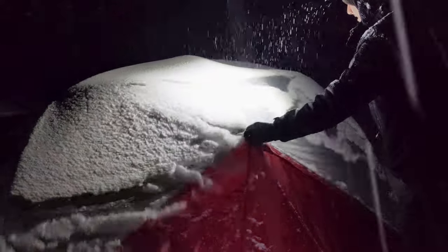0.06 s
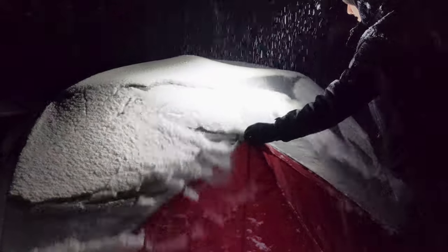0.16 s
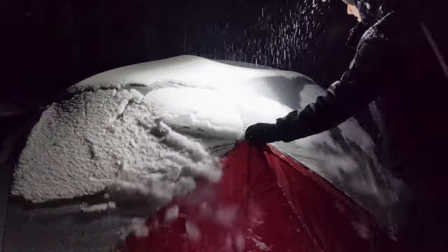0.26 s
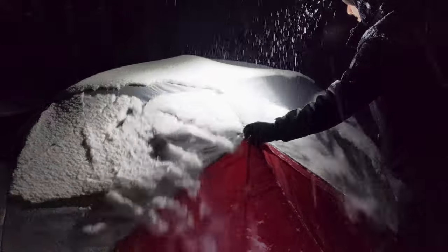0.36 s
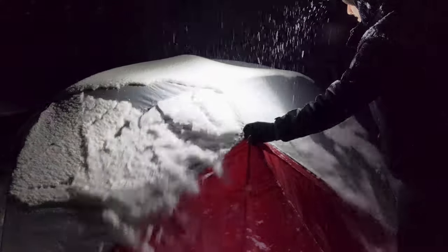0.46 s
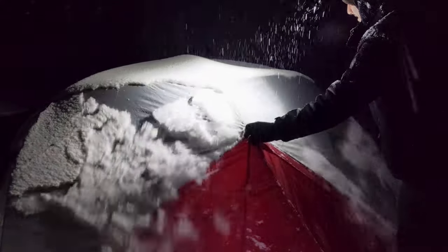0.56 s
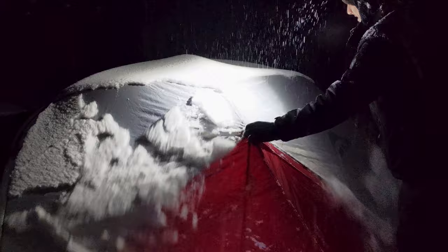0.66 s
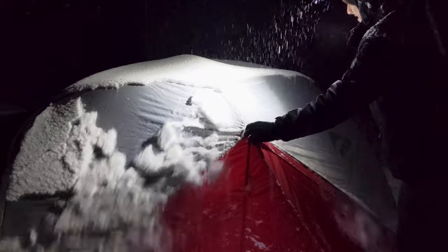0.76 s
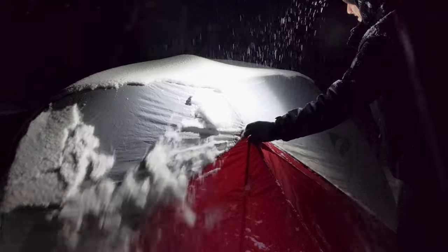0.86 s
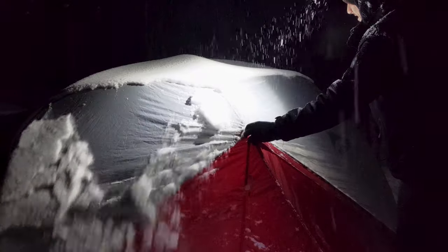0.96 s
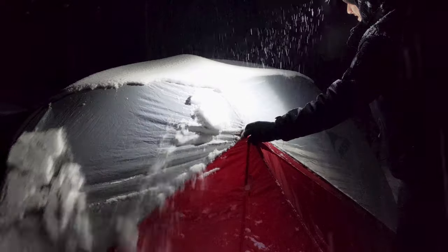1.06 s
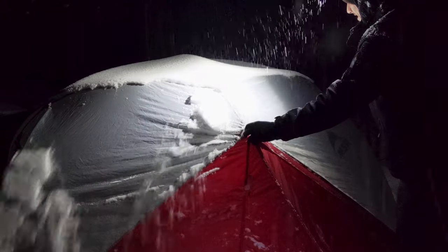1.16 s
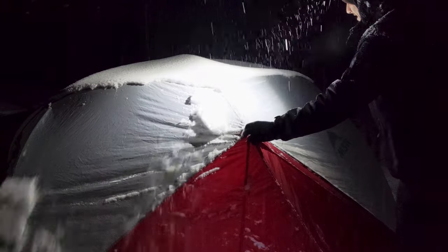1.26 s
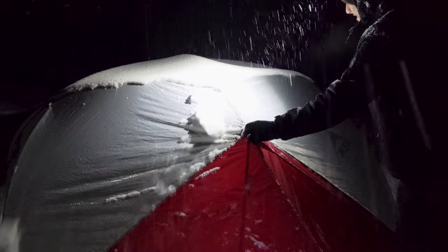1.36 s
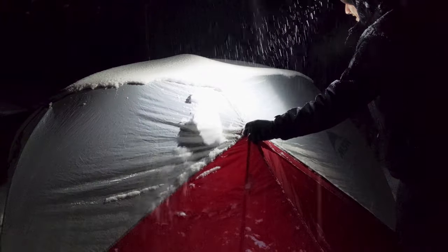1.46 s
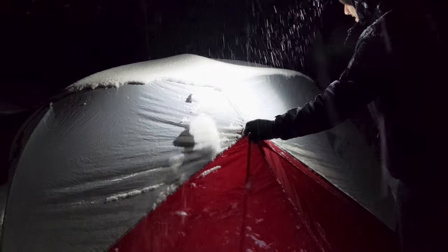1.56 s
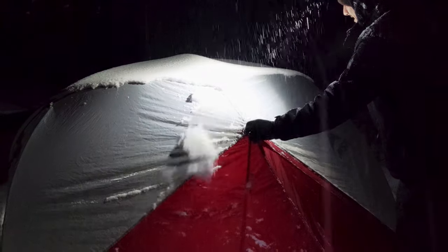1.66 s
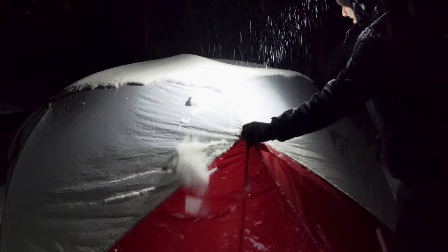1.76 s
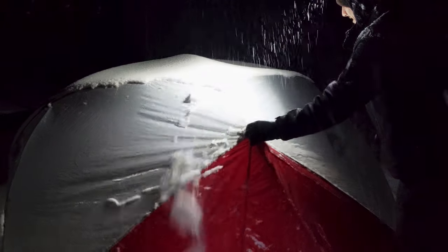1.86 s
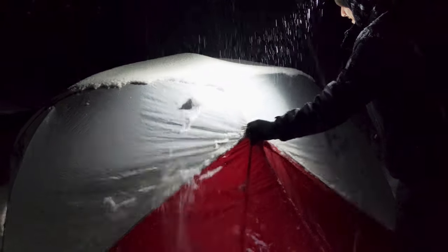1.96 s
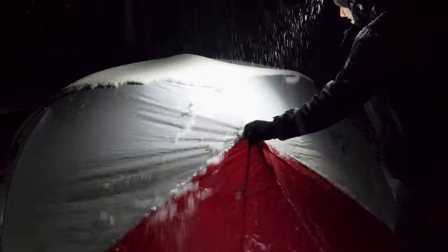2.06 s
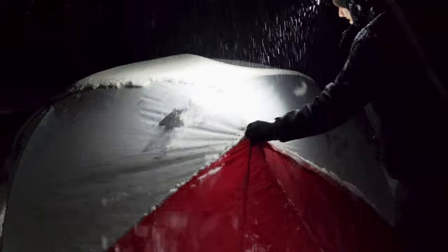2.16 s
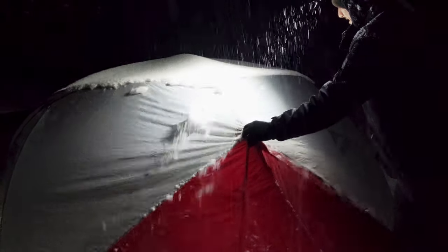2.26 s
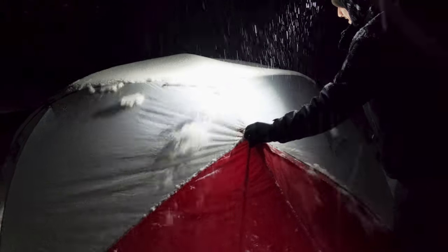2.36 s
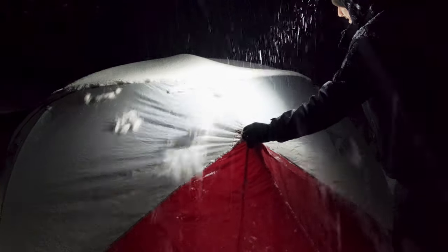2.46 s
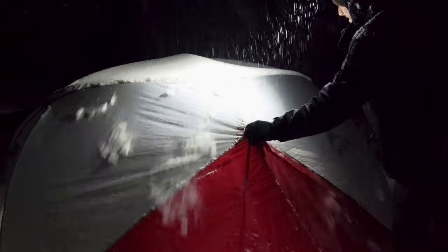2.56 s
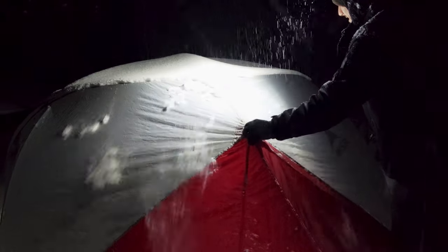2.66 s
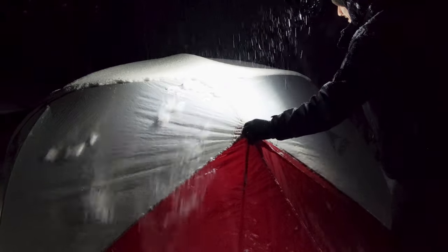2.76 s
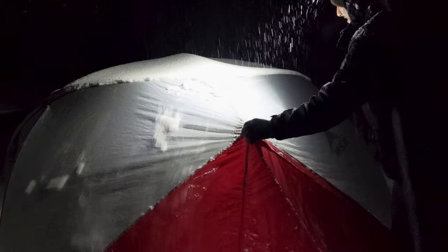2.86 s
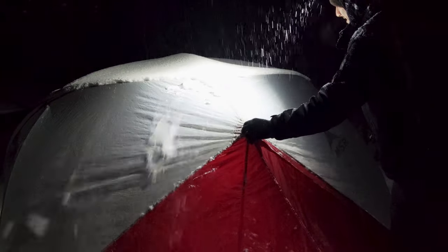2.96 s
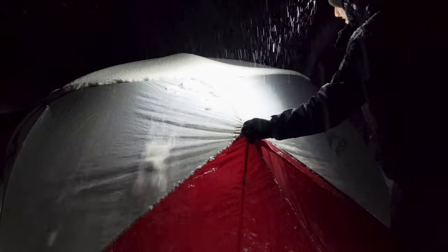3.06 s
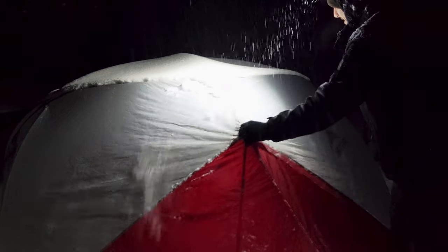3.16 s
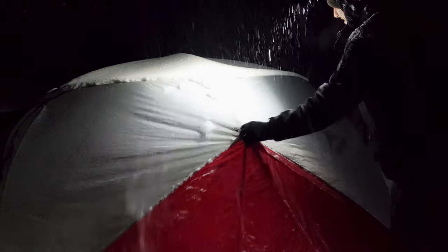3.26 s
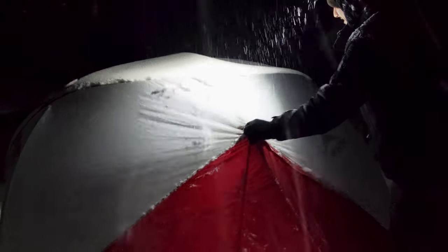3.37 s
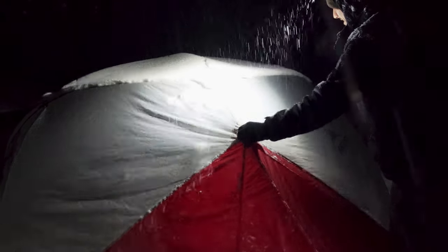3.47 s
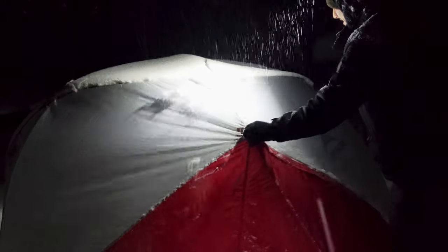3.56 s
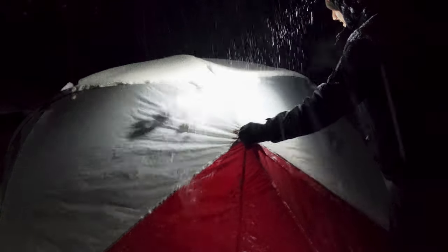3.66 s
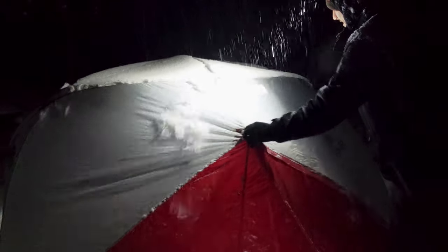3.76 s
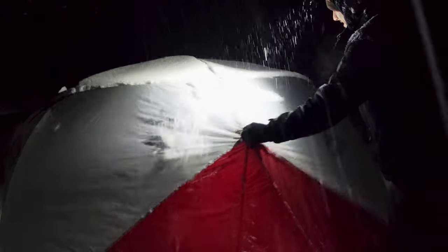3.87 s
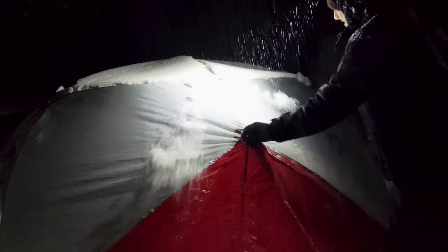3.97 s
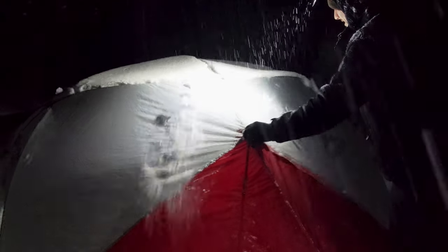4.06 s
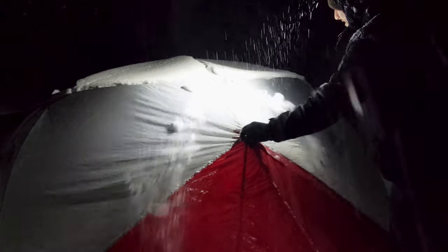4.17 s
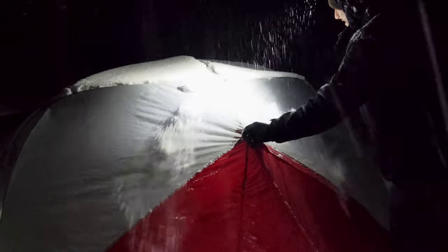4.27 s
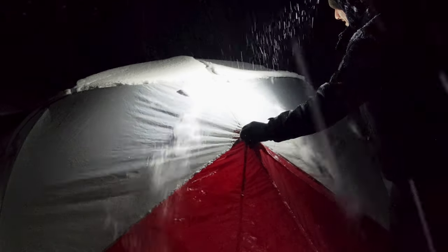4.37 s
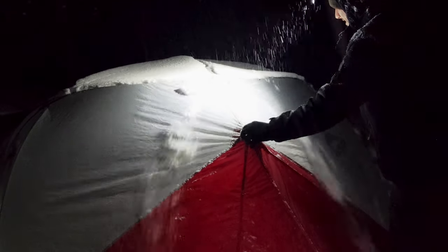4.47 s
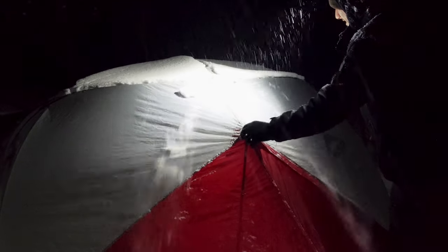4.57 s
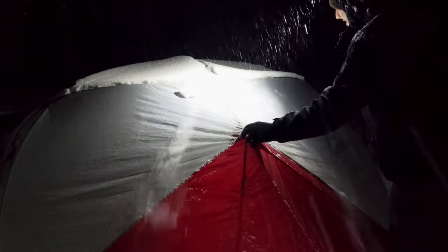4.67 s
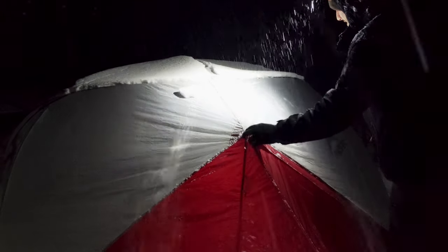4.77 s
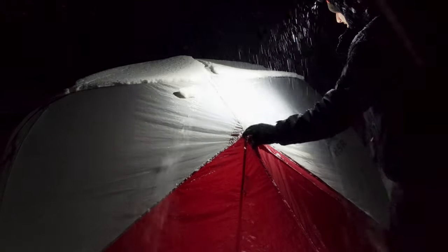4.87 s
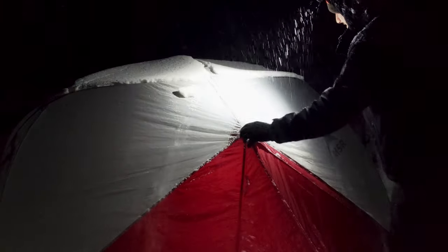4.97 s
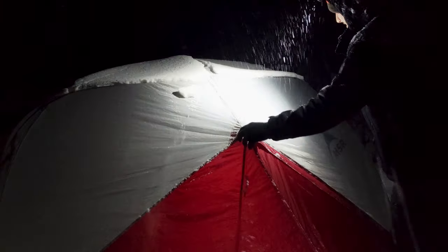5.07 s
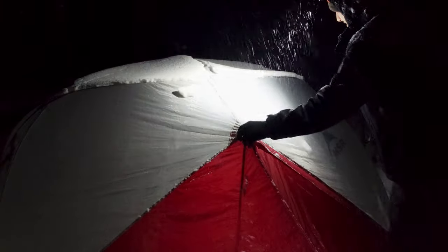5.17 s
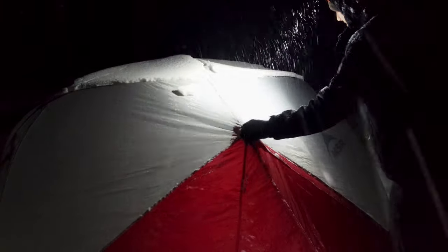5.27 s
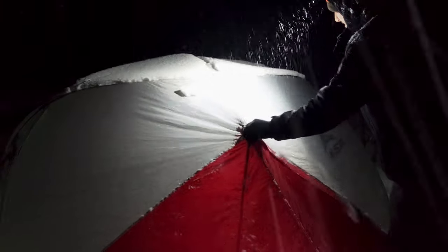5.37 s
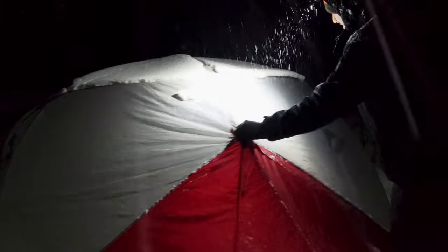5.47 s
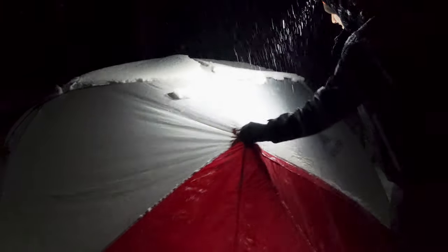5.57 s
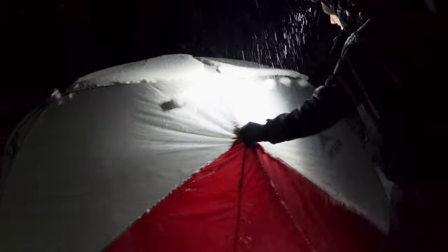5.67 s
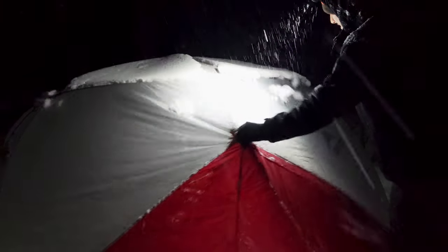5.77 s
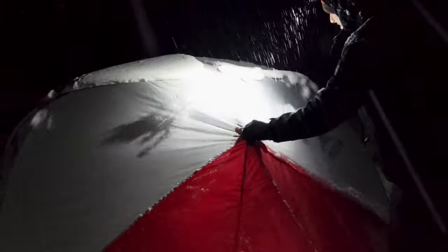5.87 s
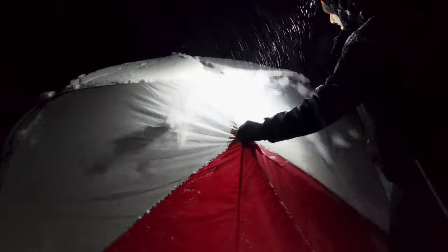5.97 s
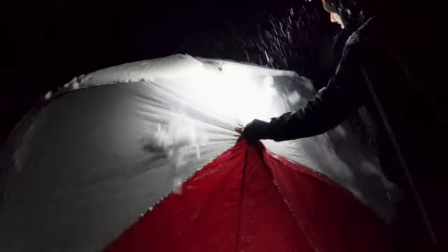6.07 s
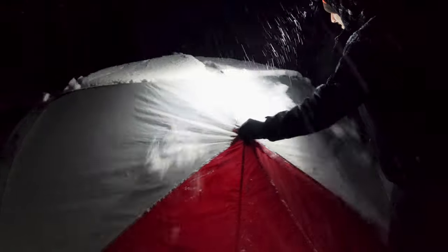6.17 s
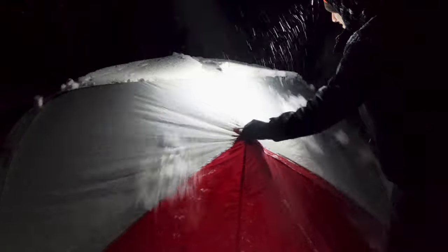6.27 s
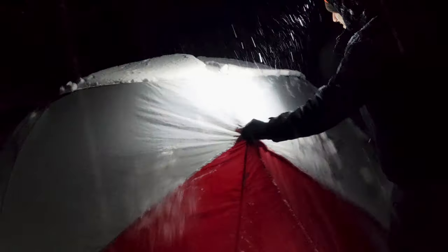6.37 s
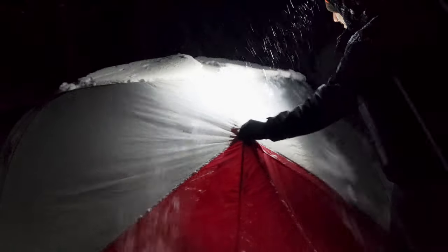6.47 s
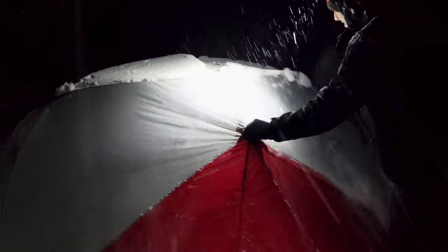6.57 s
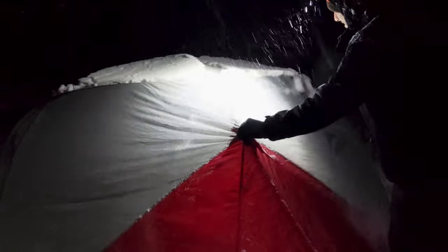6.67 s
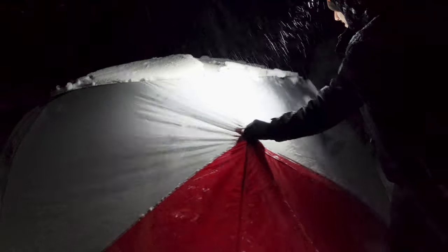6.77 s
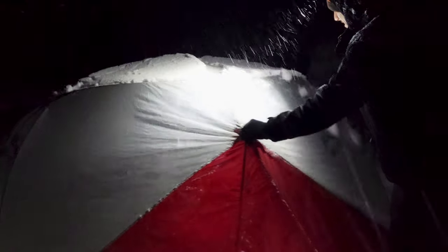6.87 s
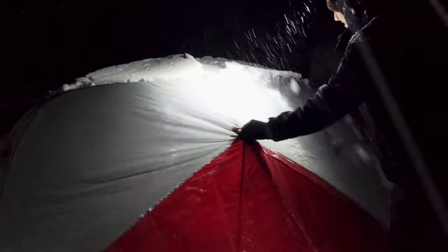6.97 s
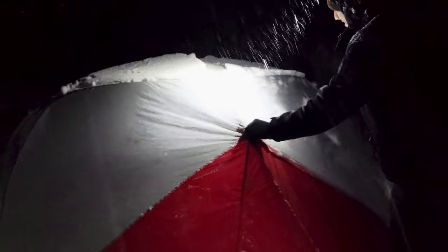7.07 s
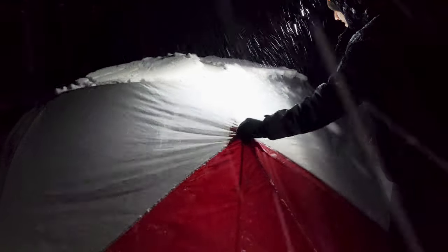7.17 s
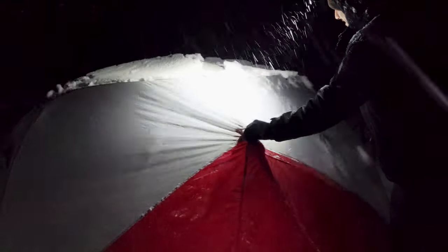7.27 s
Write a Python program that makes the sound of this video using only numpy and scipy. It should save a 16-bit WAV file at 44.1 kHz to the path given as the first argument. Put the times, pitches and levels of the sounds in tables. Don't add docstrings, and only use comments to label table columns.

```python
import sys
import numpy as np
from scipy import signal
from scipy.fft import rfft, irfft
from scipy.io import wavfile
from scipy.ndimage import uniform_filter1d

SR = 44100
rng = np.random.default_rng(int(sys.argv[2]) if len(sys.argv) > 2 else 0)


def voltage_ratio(decibels):
    exponent = np.asarray(decibels, float) / 20
    return 10 ** exponent


def unload_wav(signal):
    wavfile.write(
        sys.argv[1],
        SR,
        np.round(np.clip(np.atleast_2d(signal).T, -1, 1) * 32767).astype(np.int16),
    )


N = 322371
TIME = np.arange(N) / SR
HZ = np.maximum(np.arange(N // 2 + 1) * SR / N, 1)
TOP_HZ = 15760

# t/s, thump level/dB, crunch re thump/dB, thump f/Hz, spread/ms
SNAPS = [(1.807, -60, 3, 218, 8.4), (1.895, -59, -3, 330, 6), (2.13, -51.5, 0.5, 148.4, 6.8),
         (2.348, -49, -2, 142, 5.3), (2.548, -55, -12, 360, 5.7), (2.575, -56.5, -13, 255, 6),
         (3.283, -47, -14.5, 392, 7.3), (3.315, -50.5, -1, 198, 9.8), (3.544, -47, 0, 291.6, 9.1),
         (3.775, -50, 8, 393, 5.3), (4.007, -49.5, -3, 260, 5.4), (4.236, -55, -2.5, 194.7, 6.6),
         (5.567, -41.5, 1, 326, 6.1), (5.8, -39.5, -0.5, 278, 7.6), (6.031, -41, -2.5, 368, 5.6),
         (6.275, -43.5, 1.5, 168.8, 8.1), (6.514, -46, -5.5, 162.4, 8.9), (6.757, -44, -7, 290, 5.6),
         (6.989, -40.5, -4.5, 186, 4.03), (7.238, -43.5, -15, 165, 4.9)]
# t/s, flow level/dB, lumpiness/dB, share of whole slabs/dB
FLOW = [(0, -50.5, 2, 6), (.3, -49, 1.5, 3), (.83, -46.5, -0.5, -0.5), (1.14, -50, 1, -14),
        (1.32, -51.5, -1, -13.5), (1.43, -61, -1.5, 3), (1.72, -63, 1.5, 6.5), (2.12, -60.5, -1.5, 2),
        (2.4, -55.5, 0, -4), (2.6, -57, -1.5, -0.5), (2.9, -60, -1, -5), (3.2, -62.5, -1, 5),
        (3.55, -61, 0.5, 6), (3.9, -56, 1, -5), (4.22, -59, 1, -9), (4.6, -55, -3.5, -14),
        (5.0, -65.5, -1, -11), (5.3, -64, 1.5, 3)]
# t/s, effort level/dB
EFFORT = [(0, -63), (.6, -67.5), (1.3, -70), (1.7, -69), (1.9, -61), (2.15, -62.5), (2.45, -67.5),
          (2.7, -70), (3.05, -68.5), (3.3, -60), (4.1, -63), (4.3, -68.5), (5.0, -70.5), (5.3, -65),
          (5.75, -59.5), (6.2, -61.5), (6.9, -62), (7.31, -59)]


def power(db):
    return voltage_ratio(2 * np.asarray(db, float))


def curves(table):
    s, *columns = np.transpose(table)
    return [np.interp(TIME, s, c) for c in columns]


def on_log(table):
    hz, value = np.transpose(table)
    return np.interp(np.log(HZ), np.log(hz), value)


def closed(table, slope_db):
    below = np.maximum(np.log2(table[0][0] / HZ), 0)
    above = np.maximum(np.log2(HZ / table[-1][0]), 0)
    return voltage_ratio(on_log(table) - slope_db * (below + above))


def band(lo_hz, hi_hz, order=3):
    low_edge = 1 + (lo_hz / HZ) ** (2 * order)
    high_edge = 1 + (HZ / hi_hz) ** (2 * order)
    return 1 / np.sqrt(low_edge * high_edge)


def wide(mid, side, gain):
    # f/Hz, correlation/1
    port_likeness = [(60, .97), (150, .965), (330, .87), (700, .74), (1400, .5), (2800, .12), (6000, .08),
                     (12000, -.03)]
    like = np.clip(on_log(port_likeness), -1, 1)
    m = rfft(mid) * np.sqrt(1 + like)
    s = rfft(side) * np.sqrt(1 - like)
    pair = irfft(gain * (HZ < TOP_HZ) * np.array([m + s, m - s]), N)
    return pair / pair.std()


def walk(rate):
    k = int(SR / rate)
    held = np.repeat(rng.standard_normal(N // k + 1), k)
    return 1.1 * uniform_filter1d(uniform_filter1d(held, k), k)[:N]


def grains(rate, scatter_db):
    hit = rng.random((2, N)) < min(rate / SR, 1)
    size = voltage_ratio(scatter_db * rng.exponential(size=(2, N)))
    return hit * rng.standard_normal((2, N)) * size


def add(out, s, pair, pan_db):
    i = int(s * SR)
    n = min(pair.shape[-1], N - i)
    out[:, i:i + n] += (pair * voltage_ratio(np.array([[pan_db], [-pan_db]]) / 2))[:, :n]


def ring(hz, t60, t):
    return (t > 0) * np.sin(2 * np.pi * hz * t) * np.exp(-np.log(1000) * np.abs(t) / t60)


def hump(t, middle, spread, tail):
    x = (t - middle) / max(spread, .001)
    bell = np.exp(-x ** 2 / 2)
    return np.where(x < 0, bell, 0.6 * bell + 0.38 * np.exp(-np.abs(x) / tail))


def swells(s, db, length, tail):
    out = np.zeros(N)
    for at, peak, rise in zip(s, power(db), length):
        x = (TIME - at) / max(rise, .004)
        out += peak * np.exp(-np.where(x < 0, x, x / tail) ** 2 / 2)
    return out


def tug_swells(lag_s, level_db, rise_s, tail):
    tug_s, tug_db = np.transpose(SNAPS)[:2]
    return swells(tug_s + lag_s, tug_db + level_db, np.full(len(tug_s), rise_s), tail)


def wind():
    # f/Hz, level/dB
    wind_colour = [(8.8, -30), (15, 0.5), (28, 4), (118, -5), (150, -8.5), (200, -27), (330, -120)]
    # t/s, level/dB, rise/s
    port_gusts = [(0, -70.5, 0.033), (0.197, -73.5, 0.026), (.41, -63, 0.028), (.65, -64, 0.048),
                  (.95, -67, 0.164), (1.3, -71, .07), (1.59, -57.5, .035), (1.897, -59, 0.055),
                  (2.166, -61, 0.055), (2.498, -63, 0.095), (2.95, -67, .04), (3.13, -66, 0.034),
                  (3.316, -60.5, .05), (3.5, -59, 0.117), (4.197, -61.5, 0.12), (4.85, -69, .05),
                  (5.25, -63, .03), (5.4, -60, .06), (5.6, -57, .04), (5.718, -56.5, 0.025),
                  (5.855, -53.5, 0.023), (6.166, -60, .025), (6.49, -59, 0.087), (6.837, -58, .05),
                  (7.015, -55.5, 0.062), (7.23, -56, 0.027)]
    breeze_db = -1.5
    flutter_hz, flutter_full_db = 75, -61.5
    effort_db, = curves(EFFORT)
    gust = np.sqrt(power(effort_db + breeze_db) + swells(*np.transpose(port_gusts), 1.42))
    rumble = wide(*rng.standard_normal((2, N)), closed(wind_colour, 12))
    deep = irfft(rfft(rumble) * band(1, flutter_hz, order=2), N)
    rumble = deep + (rumble - deep) * voltage_ratio(effort_db - flutter_full_db)
    return rumble * gust * voltage_ratio(1.25 * walk(4.9))


def boom():
    # f/Hz, level/dB
    boom_colour = [(59, -33), (100, -11.5), (167, 0.5), (281, 0.5), (412, -1.5), (505, -7.5), (700, -15),
                   (910, -53), (1540, -120)]
    drum_db, tug_boom_db = -21.5, -22
    flow_db, (effort_db,) = curves(FLOW)[0], curves(EFFORT)
    pushed = tug_swells(0, tug_boom_db, .025, 2.5)
    billow = np.sqrt(power(effort_db) + power(flow_db + drum_db) + pushed)
    return wide(*grains(4000, 1.42), closed(boom_colour, 12)) * billow * voltage_ratio(0.87 * walk(9.7) - 0.4)


def ticks():
    # t/s, peak level/dB, f/Hz, left re right/dB
    seam_ticks = [(1.953, -50, 2910, 3), (1.99, -43.5, 1675, 2.0), (3.79, -42, 1500, 1),
                  (5.485, -43, 1050, 1.0), (5.578, -42, 1800, 0), (5.815, -41, 1920, 0),
                  (5.668, -36, 1500, 0), (5.854, -34, 2830, 8), (5.964, -60, 1280, -8),
                  (6.19, -41, 970, -1), (6.419, -42, 915, 1.5), (6.661, -45, 1020, -4),
                  (6.899, -41, 1320, 2.5), (7.05, -47, 993, -2), (7.146, -43.5, 905, 0.0)]
    out, t = np.zeros((2, N)), np.arange(600) / SR
    soft = 1 - np.exp(-t / .0002)
    for s, db, hz, pan_db in seam_ticks:
        pop = ring(hz, .009, t) + .8 * ring(1.45 * hz, .007, t) + .55 * ring(.65 * hz, .01, t)
        pop = pop + .5 * ring(2.1 * hz, .006, t)
        bounce = .4 * ring(1.2 * hz, .007, t - .0022)
        add(out, s, voltage_ratio(db + 1.0) * (pop + bounce)[None] * soft, pan_db)
    return out


def crumbs():
    # t/s, peak level/dB, f/Hz, left re right/dB, top ring re peak/dB
    ice_hits = [
        (3.6, -12.5, 5360, 10, -23),
        (3.675, -23, 7230, 6.5, 1),
        (3.682, -30.5, 8800, 2, 1),
        (3.917, -37, 7000, .6, 8),
        (5.853, -31, 5500, .6, -20),
    ]
    right_lead_ms = 0.2364
    out, t = np.zeros((2, N)), np.arange(1400) / SR
    late = t - .0013 + np.array([[0], [right_lead_ms / 1000]])
    thin = signal.butter(4, [3400, 16000], "band", fs=SR, output="sos")
    for s, db, hz, pan_db, top_db in ice_hits:
        crack = ring(hz, 0.0022, late) + 0.62 * ring(1.295 * hz, 0.0029, late)
        crack = crack + 0.73 * ring(0.85 * hz, 0.0025, late) + 0.3 * ring(1.838 * hz, 0.0031, late)
        crack = crack + 0.45 * ring(min(2.09 * hz, 15000), 0.00155, late)
        top = ring(13600, 0.0043, late) + .6 * ring(15500, 0.0017, late) + ring(11270, 0.002, late)
        crack = (crack + voltage_ratio(top_db) * top) * (1 - np.exp(-np.abs(late) / 0.00042))
        burst = 0.048 * np.exp(-(late / 0.00043) ** 2)
        scatter = 0.016 * (late > 0) * np.exp(-t / 0.01)
        shards = rng.standard_normal((2, len(t))) * (burst + scatter)
        add(out, s, voltage_ratio(db + 1.0) * signal.sosfilt(thin, crack + shards), pan_db)
    return out


def snaps():
    delay = .013
    crisp_db, crisp_slope = 15.5, 0.61
    focus = .5
    out, t = np.zeros((2, N)), np.arange(SR // 6) / SR - .02
    thud = wide(*rng.standard_normal((2, N)), band(150, 390, order=2))
    crease = wide(*grains(2500, 1.9), band(820, 1450, order=2))
    crisp = wide(*grains(4000, 1.5), band(1700, 4200, order=2))
    for s, db, crunch_db, hz, spread_ms in SNAPS:
        spread = spread_ms / 1000
        i = min(int(s * SR), N - len(t))
        cut = slice(i, i + len(t))
        thump = 0.477 * thud[:, cut] + 0.42 * np.sin(2 * np.pi * hz * t)
        thump = thump * hump(t, 0.73 * delay, 1.33 * spread, 4.3)
        shape = hump(t, delay, 0.59 * spread, 7.26)
        low = crease[:, cut] * shape
        high = crisp[:, cut] * hump(t, 1.1 * delay, 0.45 * spread, 4.0)
        energy = np.sum(shape ** 2)
        low = low * np.sqrt(energy / np.sum(low.mean(axis=0) ** 2))
        high = high * np.sqrt(energy / np.sum(high.mean(axis=0) ** 2))
        crunch = 0.63 * (low + voltage_ratio(crisp_db + crisp_slope * (db + crunch_db)) * high)
        crunch = crunch + focus * (crunch.mean(axis=0) - crunch)
        add(out, s + t[0], voltage_ratio(db) * (thump + voltage_ratio(crunch_db) * crunch), .7)
    return out


def whistles():
    # t/s, level/dB, rise/s
    fast_lumps = [(0.157, -60, 0.035), (.35, -58.5, 0.051), (0.828, -62, 0.054), (1.14, -56, .07),
                  (1.322, -58.5, 0.035), (1.955, -63, .03), (2.22, -67, .04), (2.588, -66, .05),
                  (2.695, -65.5, .03), (3.697, -67, .03), (3.95, -69, .05), (4.38, -65, .05),
                  (4.582, -60.5, 0.083), (5.678, -62.5, 0.043), (6.16, -64, 0.035), (6.335, -63.5, .04),
                  (6.63, -63, .06), (6.8, -66.5, .04), (7.28, -63.5, .03)]
    tone = wide(*grains(9000, 0.93), band(9164, 9460, order=40))
    return tone * np.sqrt(swells(*np.transpose(fast_lumps), 1.3)) * voltage_ratio(-3.0)


def snow():
    # f/Hz, level/dB
    grain_colour = [(400, 9), (700, 2.5), (1200, 2.5), (2000, 2), (3200, -2.5), (4500, -2), (8000, -4),
                    (12000, -2), (15700, 0.5)]
    # t/s, level/dB, rise/s, lumpiness/dB
    loose_puffs = [(0.149, -57, 0.032, 4), (.57, -58.5, 0.145, -12.5), (1.505, -65, 0.021, 6.5),
                   (1.771, -54.5, 0.0138, -1), (1.84, -58.5, .012, 1.5), (1.955, -56, 0.0233, 1),
                   (2.22, -54, 0.0238, -0.5), (2.702, -69, 0.049, -5.5), (3.246, -61, 0.0234, 3.5),
                   (3.37, -60, .025, 5), (3.446, -64, 0.0146, -2), (3.671, -56, 0.025, 1),
                   (3.8, -58, 0.0094, 0), (4.08, -53.5, 0.008, -6.5), (4.304, -56, 0.0222, -2),
                   (5.37, -59, .03, 2), (5.493, -61, 0.0175, -3), (5.664, -58, 0.048, 2),
                   (5.86, -54, 0.033, 0), (6.061, -53.5, 0.063, 0), (6.226, -56.5, 0.0226, 3),
                   (6.338, -52.5, 0.0418, 1), (6.627, -56, 0.115, -1), (6.82, -56.5, 0.0232, -1.5),
                   (6.92, -60.5, 0.0277, 1), (3.61, -56, .006, -1), (5.2, -75, .04, 0),
                   (7.042, -53.5, 0.031, -1.5), (7.17, -59, 0.03, -3), (7.29, -54.5, 0.026, 0)]
    puff_tail = 1.19
    shed_db, rustle_db = -4, 2.5
    crust_db, slab_db = -2.5, -13
    slab_edge_hz, slab_sharpen = 1960, 0.32
    (flow_db, lump_db, slabs_db), (effort_db,) = curves(FLOW), curves(EFFORT)
    s, db, length, lumps_db = np.transpose(loose_puffs)

    dust = power(effort_db + shed_db)
    fine = power(flow_db) + dust + swells(s, db, length, puff_tail)
    lumpy = power(flow_db + lump_db) + 1.38 * dust + swells(s, db + lumps_db, length, puff_tail)
    heavy = power(flow_db + slabs_db + slab_db) + power(effort_db + rustle_db) + .12 * lumpy
    heavy = heavy + tug_swells(0.025, -18.5, 0.009, 2.3)

    colour, surge = closed(grain_colour, 12), .5 * walk(16)
    powder = wide(*grains(30000, 1.0), colour * band(5990, TOP_HZ, order=4))
    powder = powder * np.sqrt(fine) * voltage_ratio(surge + 0.62 * walk(30))
    crust = wide(*grains(12000, 0.88), colour * band(2520, 5760, order=4))
    crust = crust * np.sqrt(lumpy) * voltage_ratio(crust_db + surge + 0.58 * walk(25))
    slab = wide(*grains(5000, 0.48), colour * band(763, 2963, order=4))
    slab = slab * np.sqrt(heavy) * voltage_ratio(surge + 0.83 * walk(14))
    dull = irfft(rfft(slab) * band(1, slab_edge_hz), N)
    slab = dull + (slab - dull) * voltage_ratio(slab_sharpen * slabs_db)
    return powder + crust + slab


def scene():
    return wind() + boom() + ticks() + crumbs() + snaps() + whistles() + snow()


def low_pass(x):
    return signal.sosfilt(signal.butter(12, 16990, fs=SR, output="sos"), x)


def record(dry):
    # f/Hz, width/Hz, level/dB
    housing_modes = [(1623, 280, 4.5), (1871, 520, -6.5), (2323, 220, 2.5), (3830, 160, 1),
                     (4474, 640, -2.5), (5110, 690, 3.5), (5710, 840, 7.5), (6520, 480, -2.5),
                     (7400, 1320, 7.5), (8550, 420, 0), (9720, 1530, 5), (11740, 690, 5.5),
                     (14900, 1000, 3.5)]
    # f/Hz, left re right/dB
    port_balance = [(60, 0.0), (110, 0.0), (200, 0.5), (380, 1.0), (700, 1.5), (1290, 0.0), (2380, 1.0),
                    (4400, 0.0), (8120, -0.5), (15000, -1.0)]
    gain = band(1, TOP_HZ + 150, order=60)
    for hz, width_hz, db in housing_modes:
        detune = 1j * (HZ / hz - hz / HZ) * hz / width_hz
        gain = gain * (voltage_ratio(db / 2) + detune) / (voltage_ratio(-db / 2) + detune)
    tilt = on_log(port_balance) / 2
    heard = irfft(rfft(dry) * gain * voltage_ratio(np.array([tilt, -tilt])), N)
    return low_pass(heard)


dry = scene()
out = record(dry)
unload_wav(out)
```